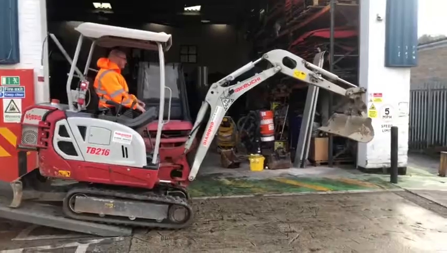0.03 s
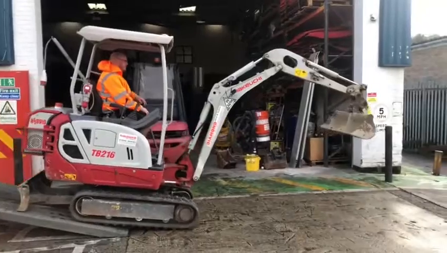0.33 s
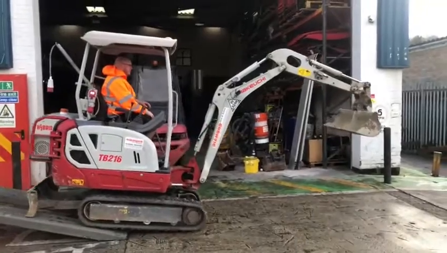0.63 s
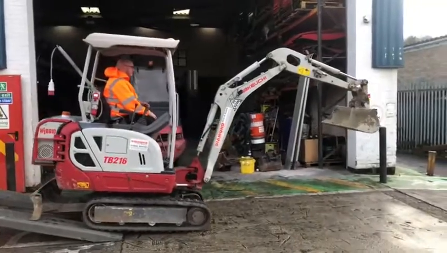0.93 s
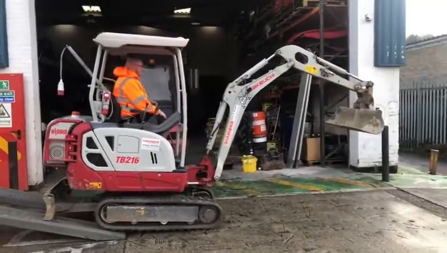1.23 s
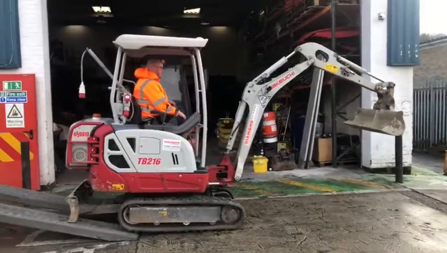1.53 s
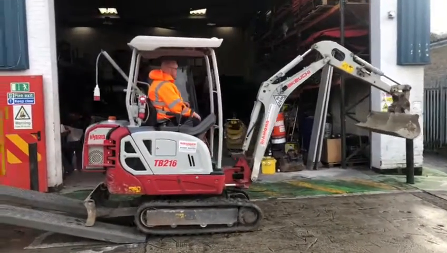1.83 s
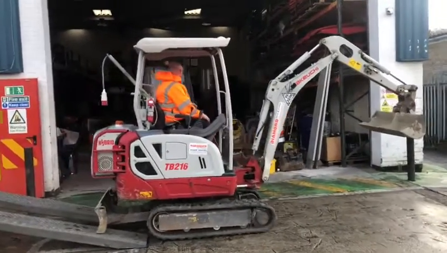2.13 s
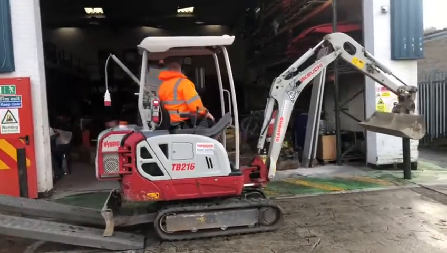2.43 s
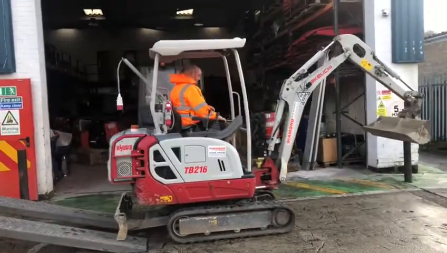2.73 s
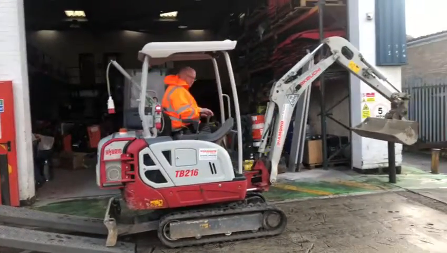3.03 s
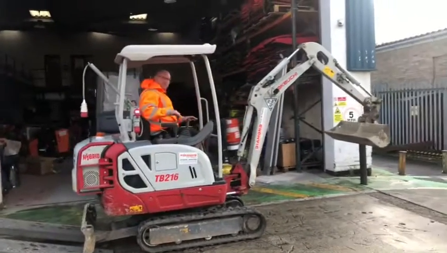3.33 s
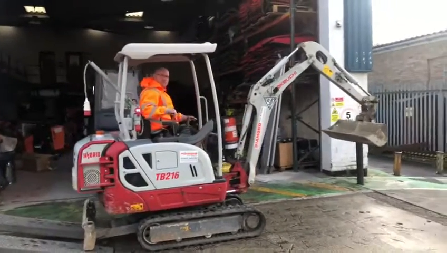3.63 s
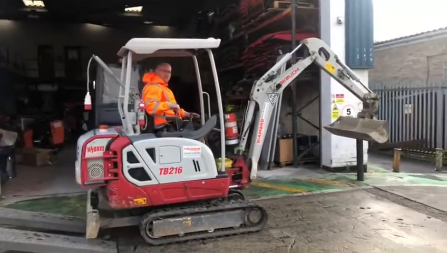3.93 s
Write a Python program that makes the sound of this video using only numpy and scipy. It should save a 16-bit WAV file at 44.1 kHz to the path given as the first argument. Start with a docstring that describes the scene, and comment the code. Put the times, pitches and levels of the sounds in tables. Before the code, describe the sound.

A small digger's tracks clank loudly off metal ramps, dropping to faint clatter and hum.

```python
"""In a yard, a small tracked digger crawls off steel ramps a few metres away. The periodic firing of its
diesel makes a drone that sags in pitch under load. Impacts of the tracks excite the modes of the steel,
which rattles, rumbles and clanks; grit and stones crack underneath, and the walls add a short echo.
At 1.5 s the sound drops abruptly: a faint, hollow track clatter goes on until the machine stops
at 3 s and leaves a quiet hum."""
import sys
import numpy as np
from scipy import signal
from scipy.fft import rfft, irfft, next_fast_len
from scipy.io import wavfile
from scipy.ndimage import uniform_filter1d

SR = 44100
rng = np.random.default_rng(int(sys.argv[2]) if len(sys.argv) > 2 else 0)


def wav_record(signal):
    """Record a signal, one row per channel, as 16-bit PCM in the file named by sys.argv[1]."""
    frames = np.transpose(np.atleast_2d(signal))
    bounded = np.clip(frames, -1, 1)
    # unit amplitude maps onto the largest positive 16-bit level
    quanta = np.round(bounded * 32767).astype(np.int16)
    wavfile.write(sys.argv[1], SR, quanta)


N = 176400
T = np.arange(N) / SR

# Spectrum of struck steel. Each row: frequency in Hz, relative spectral density in dB.
STEEL_SPECTRUM = [(100, -4), (300, 1), (480, -0.5), (580, 5.5), (780, 7.5), (1000, -0.5), (1400, -7),
                  (1700, -10.5), (1950, -9.5), (2250, -16), (2800, -17.5), (3250, -16), (3700, -20.5),
                  (5000, -27.5), (6300, -28), (7500, -35.5), (11500, -50)]
# Spectrum of a heavy thud. Each row: frequency in Hz, relative spectral density in dB.
THUD_SPECTRUM = [(30, -17.5), (55, -2.5), (75, 6), (105, 2), (135, 4.5), (190, 0.5), (255, 2.5),
                 (330, -7.5), (440, -3.5), (520, -11), (800, -44.5)]
THUD_T60_S = .24


def engine():
    """Combustion is periodic: each firing drives the exhaust tone and knocks on the block."""
    # Each row: time in seconds, firing rate in Hz, level of the tone in dB.
    running = [(0, 76.26, -30.5), (.15, 75.95, -29), (.55, 76.28, -28.5), (.76, 76.17, -30),
               (.92, 69.75, -28.5), (1.1, 70.63, -30.5), (1.22, 64.94, -29), (1.48, 66, -36.5)]
    knock_db, knock_decay_cycles = -37.5, .34
    tone, phase = exhaust(curve(running, 1))
    knock = colour(rng.standard_normal(N) * np.exp(-phase / knock_decay_cycles), STEEL_SPECTRUM)
    return tone * undb(curve(running, 2)) + undb(knock_db) * unit(knock)


def exhaust(firing_hz):
    """Uneven firings put half orders between the harmonics. Returns the tone and the firing phase."""
    # Each row: multiple of the firing rate, relative level in dB.
    orders = [(.5, -23), (1, -0.5), (1.5, -12), (2, -10), (2.5, -15.5), (3, -22), (3.5, -16.5), (4, -21),
              (5, -19.5), (6, -18)]
    cycles = np.cumsum(firing_hz * (1 + .005 * walk(25))) / SR
    tone = sum(undb(db + .9 * walk(30)) * np.sin(2 * np.pi * (order * cycles + rng.random()))
               for order, db in orders)
    return unit(tone), cycles % 1


def clanks():
    """Impact excitation: each hard blow of a track on a ramp gives a ring, a bright crash and a thud."""
    # Each row: start in seconds, then levels of body, treble and thud in dB.
    impacts = [(0.06, -28, -50, -31.5), (.115, -29, -42, -30.5), (.132, -25, -34.5, -33.5),
               (.184, -25.5, -42, -27.5), (.21, -28.5, -44, -46), (.318, -23, -38.5, -32),
               (.395, -27, -65, -29), (.49, -27.5, -35.5, -43), (.548, -27, -30, -37), (.62, -28, -31, -24),
               (.648, -33.5, -37.5, -27), (.685, -23.5, -33, -25), (0.755, -23, -29, -29),
               (.772, -23.5, -27, -33), (0.835, -19, -31, -22.5), (.901, -28, -34, -26.5),
               (.948, -20.5, -24, -24.5), (1.03, -19.5, -31, -29.5), (1.087, -16.5, -28.5, -24),
               (1.11, -18, -29.5, -24), (1.15, -23, -32.5, -33.5), (1.175, -20, -36, -22.5),
               (1.233, -18.5, -29.5, -25.5), (1.263, -22, -34, -24), (1.301, -26.5, -26.5, -22.5),
               (1.373, -22.5, -23, -19.5), (1.388, -19.5, -29.5, -19.5), (1.42, -27.5, -24, -27),
               (1.446, -20, -24, -28), (1.468, -36.5, -35.5, -27)]
    out = np.zeros(N)
    for start, body_db, treble_db, thud_db in impacts:
        body, _ = split(struck_steel(crash_t60=.13))
        _, treble = split(struck_steel(crash_t60=.14))
        thud = burst(THUD_SPECTRUM, THUD_T60_S)
        add(out, blow(body, body_db) + blow(treble, treble_db) + blow(thud, thud_db), start)
    return out


def struck_steel(crash_t60):
    """Modal vibration: dense modes merge into a crash while the main ones ring, the lowest longest."""
    # Modes of ramps and undercarriage. Each row: frequency in Hz, relative level in dB.
    modes = [(437, 3), (600, 1), (673, -1), (716, 14), (822, 12.5), (892, -17), (955, 0.5), (1211, 2.5),
             (1448, -1.5), (1523, -11), (1900, -10.5), (2487, -7), (3198, -14.5)]
    crash = burst(STEEL_SPECTRUM, crash_t60)
    t, ring = T[:len(crash)], 0
    for hz, db in modes:
        force, detune = rng.standard_normal(2)  # different at every spot struck
        t60 = .22 * (700 / hz) ** .62
        ring += undb(db) * force * np.sin(2 * np.pi * hz * (1 + .001 * detune) * t) * fade(t60)
    return unit(crash) + undb(-8.5) * unit(ring)


def track_rattle():
    """Random impacts of links and rollers overlap into a rattle; the machine's weight makes them rumble."""
    # Each row: time in seconds, then levels of body, treble and rumble in dB.
    levels = [(0, -50, -41, -32), (.14, -33, -49.5, -39.5), (.46, -40, -42, -41.5), (.6, -27, -37, -48),
              (.72, -25.5, -36.5, -28.5), (.91, -27.5, -37.5, -38.5), (1.0, -25, -30, -31),
              (1.2, -32.5, -36.5, -33), (1.35, -26, -30, -27), (1.46, -18.5, -32.5, -24)]
    body, treble = split(shake(lambda: struck_steel(crash_t60=.11), per_second=600))
    rumble = shake(lambda: burst(THUD_SPECTRUM, THUD_T60_S), per_second=200)
    return (unit(body) * undb(curve(levels, 1)) + unit(treble) * undb(curve(levels, 2))
            + rumble * undb(curve(levels, 3)))


def pin_clinks():
    """Damped resonance: track pins ring briefly as they strike the hardest edges."""
    # Each row: start in seconds, level in dB.
    clinks = [(0.132, -34), (0.771, -36), (.949, -38), (1.373, -29.5)]
    # Each row: frequency in Hz, relative spectral density in dB.
    pin_spectrum = [(1300, -23), (1650, -4), (1900, 9), (2080, -2), (2300, -12), (3300, -13), (4200, -32),
                    (9000, -38.5)]
    return strikes(clinks, pin_spectrum, t60=.061)


def stone_cracks():
    """Brittle fracture: stones break under the tracks, each with a short, bright crunch."""
    # Each row: start in seconds, level in dB.
    fractures = [(0.549, -38.5), (.62, -50), (0.949, -38), (1.303, -38.5), (1.371, -34)]
    # Each row: frequency in Hz, relative spectral density in dB.
    crack_spectrum = [(2000, -17), (3800, 3.5), (5600, 2.5), (6500, 0), (7500, -8), (11500, -12.5)]
    return strikes(fractures, crack_spectrum, t60=.16)


def grit():
    """Many tiny fractures add up to a crunch as the tracks crush grit on the concrete."""
    # Each row: time in seconds, level in dB.
    levels = [(0, -60.5), (.49, -59), (.56, -52), (.78, -45), (.9, -50.5), (1.05, -48), (1.16, -40),
              (1.21, -48.5), (1.33, -49), (1.47, -41)]
    # Each row: frequency in Hz, relative spectral density in dB.
    grit_spectrum = [(2000, -14.5), (4000, 6.5), (6300, -3), (8000, -1), (11000, -1.5), (12000, -9.5)]
    crunch = shake(lambda: burst(grit_spectrum, t60=.024), per_second=1500)
    return crunch * undb(curve(levels, 1) + walk(17))


def faint_clatter():
    """Light impacts of the links excite hollow resonances until the tracks come to rest."""
    # Continuous rattle. Each row: time in seconds, then levels of body and treble in dB.
    levels = [(1.48, -53.5, -65.5), (1.6, -62.5, -76), (1.71, -63, -79), (1.74, -72, -79.5),
              (1.78, -57, -67.5), (1.88, -53.5, -63.5), (2.0, -57.5, -70), (2.11, -57.5, -70),
              (2.17, -54, -63.5), (2.47, -55, -65.5), (2.68, -52.5, -59.5), (2.77, -57, -65.5),
              (2.87, -54.5, -61), (2.99, -56, -66), (3.07, -65, -74), (3.3, -78.5, -90.5), (4, -81, -89)]
    # Single knocks. Each row: start in seconds, then levels of body and treble in dB.
    knocks = [(1.762, -56, -65), (1.826, -50, -58.5), (1.88, -70, -67), (1.947, -53.5, -81),
              (2.016, -52.5, -69), (2.138, -51.5, -62), (2.197, -59, -64), (2.252, -50.5, -62),
              (2.275, -55, -66), (2.397, -56, -63), (2.524, -54, -60.5), (2.648, -52, -71),
              (2.814, -49.5, -59.5), (2.86, -61, -66), (3.725, -66.5, -81)]
    # Resonances of the tracks. Each row: frequency in Hz, relative spectral density in dB.
    hollow_spectrum = [(120, -32), (200, -21.5), (249, -10), (322, -37.5), (401, -11.5), (459, -11.5),
                       (517, -12.5), (553, -3), (592, -0.5), (738, 3), (817, -3), (968, -8.5), (1070, -17),
                       (1430, -11.5), (1780, -20), (2010, -18.5), (2150, -23), (2460, -15), (2820, -19),
                       (4020, -22), (4450, -27.5), (4840, -23), (7150, -35), (10600, -46.5), (11500, -37),
                       (15000, -79), (22000, -120)]
    # Treble of a knock. Each row: frequency in Hz, relative spectral density in dB.
    tick_spectrum = [(1300, -11), (1500, 15), (2100, -4), (2500, 7), (4000, 3), (5000, 0.5), (7000, -5.5),
                     (11500, -20)]
    body, treble = split(shake(lambda: burst(hollow_spectrum, t60=.058), per_second=900))
    out = unit(body) * undb(curve(levels, 1)) + unit(treble) * undb(curve(levels, 2))
    for start, body_db, treble_db in knocks:
        knock, _ = split(burst(hollow_spectrum, t60=.14))
        tick = burst(tick_spectrum, t60=.2)
        add(out, blow(knock, body_db) + blow(tick, treble_db), start)
    return out


def faint_hum():
    """Superposition: the engine's faint harmonics and a wavering tone lie over a low boom and a hush."""
    # Each row: time in seconds, firing rate in Hz, then levels of hum and boom in dB.
    running = [(1.48, 72, -70.5, -64), (1.75, 74.1, -74.5, -68), (1.95, 74.5, -69, -63.5),
               (2.35, 74.1, -78, -67.5), (2.55, 72.8, -75, -65.5), (2.95, 74.7, -77.5, -70.5),
               (3.2, 80.56, -71.5, -73.5), (3.52, 80.7, -75, -79), (3.7, 79.4, -83.5, -73.5),
               (4, 79, -84, -79)]
    # Hollow tone, strongest while the machine rolls. Each row: time in seconds, level in dB.
    tone_levels = [(1.5, -82), (1.78, -77), (1.9, -68), (2.33, -67), (2.45, -80), (2.9, -71.5),
                   (3.1, -81.5), (4, -94)]
    # Two noise spectra. Each row: frequency in Hz, relative spectral density in dB.
    boom_spectrum = [(35, -14), (55, -9), (90, -4.5), (130, -5), (170, -0.5), (260, -3), (400, -6.5),
                     (600, -37.5)]
    hush_spectrum = [(18, -58), (30, -31.5), (81, -7.5), (104, -7.5), (296, -13.5), (327, -10), (674, -16),
                     (782, -12), (1350, -19.5), (1530, -22), (11500, -31.5), (15000, -63), (22000, -120)]
    hum, _ = exhaust(curve(running, 1))
    boom = unit(colour(rng.standard_normal(N), boom_spectrum))
    hush = unit(colour(rng.standard_normal(N), hush_spectrum))
    tone = wavering_tone(hz=134, spread=.03, rate=9.4)
    return (hum * undb(curve(running, 2) + 1.574 * walk(30))
            + boom * undb(curve(running, 3))
            + tone * undb(curve(tone_levels, 1) + 2.5 * walk(18))
            + hush * undb(-72.5 + .7 * walk(14)))


def roller_squeak():
    """A track roller squeaks once: a frequency-modulated tone under a Gaussian envelope."""
    centre_s, width_s = 2.67, .03
    envelope = np.exp(-((T - centre_s) / width_s) ** 2)
    return undb(-69) * wavering_tone(hz=4720, spread=.008, rate=150) * envelope


def yard(x):
    """Reverberation: reflections from the walls and the open workshop add a short, decaying tail."""
    size, delay_s, echo_db = SR // 2, .014, -7
    tail = rng.standard_normal(size) * fade(t60=.4, size=size) * (T[:size] > delay_s)
    return x + undb(echo_db) * signal.fftconvolve(x, tail / np.linalg.norm(tail))[:N]


def shake(ring, per_second, spots=12):
    """Shot noise: random impacts of uneven force fall on several spots, each with its own response."""
    out, scatter_db = 0, 2
    for _ in range(spots):
        hits = rng.random(N) < per_second / spots / SR
        force = undb(scatter_db * np.clip(rng.standard_normal(N), -2, 2))
        out += signal.fftconvolve(hits * force, unit(ring()))[:N]
    return unit(out)


def burst(spectrum, t60, size=16384):
    """Modal overlap: a blow on countless close resonances sounds as decaying coloured noise."""
    attack_s = .0014  # a blow builds over several contacts
    rise = 1 - np.exp(-T[:size] / attack_s)
    return colour(rng.standard_normal(size) * fade(t60) * rise, spectrum)


def strikes(events, spectrum, t60):
    """Superposition of noise bursts, one for each start time and level."""
    out = np.zeros(N)
    for start, db in events:
        add(out, blow(burst(spectrum, t60), db), start)
    return out


def wavering_tone(hz, spread, rate):
    """Frequency modulation: a sine at rms 1 whose pitch wanders at random."""
    return unit(np.sin(2 * np.pi * np.cumsum(hz * (1 + spread * walk(rate))) / SR))


def colour(x, spectrum):
    """Minimum-phase filter that follows points of frequency in Hz and gain in dB."""
    size = 2 * next_fast_len(len(x))
    hz, db = np.array(spectrum).T
    bin_hz = np.arange(size // 2 + 1) * SR / size
    gain = undb(np.interp(np.log(bin_hz + 1), np.log(hz), db))
    cepstrum = irfft(np.log(gain))
    cepstrum[1:size // 2] *= 2  # folding onto positive time makes the filter causal
    cepstrum[size // 2 + 1:] = 0
    return irfft(rfft(x, size) * np.exp(rfft(cepstrum)))[:len(x)]


def split(x, crossover_hz=1390):
    """A crossover separates the body of a sound from its treble."""
    return [signal.sosfilt(signal.butter(4, crossover_hz, kind, fs=SR, output="sos"), x)
            for kind in ("low", "high")]


def walk(rate):
    """Smooth random fluctuation at rms 1, with `rate` new values a second."""
    hold = int(SR / rate)
    steps = np.repeat(rng.standard_normal(N // hold + 1), hold)
    return unit(uniform_filter1d(uniform_filter1d(steps, hold), hold)[:N])


def fade(t60, size=16384):
    """Exponential decay by 60 dB in t60 seconds."""
    return np.exp(-np.log(1000) * T[:size] / t60)


def blow(x, db):
    """Give a transient the energy of 20 ms of steady sound at this level."""
    return undb(db) * x / np.sqrt(np.sum(x ** 2) / (.02 * SR))


def add(out, x, start):
    """Mix a sound in at its start in seconds."""
    i = int(start * SR)
    out[i:i + len(x)] += x[:N - i]


def curve(table, column):
    """Linear interpolation of one column over time."""
    rows = np.array(table)
    return np.interp(T, rows[:, 0], rows[:, column])


def undb(db):
    """Decibels to amplitude gain."""
    return 10 ** (np.asarray(db) / 20)


def unit(x):
    """Scale to rms 1."""
    return x / np.sqrt(np.mean(x ** 2))


def drop(linger_s=0):
    """Gain that falls linearly from one to zero where the loud part ends."""
    start_s, length_s = 1.474, .018
    return np.clip(1 - (T - start_s - linger_s) / length_s, 0, 1)


def scene():
    """A rapid crossfade leads from the loud descent to the faint roll-out; the bass goes last."""
    loud = engine() + yard(track_rattle() + clanks() + pin_clinks() + grit() + stone_cracks())
    bass = signal.sosfiltfilt(signal.butter(2, 150, fs=SR, output="sos"), loud)
    faint = faint_clatter() + faint_hum() + roller_squeak()
    return (drop() * (loud - bass) + drop(linger_s=.018) * bass + (1 - drop()) * faint)[None]


def record(dry):
    """A soft limiter rounds the loudest peaks; filters trim the deepest bass and the top."""
    peak_limit, bottom_hz, top_hz = .7, 36, 11600
    rounded = peak_limit * np.tanh(dry / peak_limit)
    thinned = signal.sosfilt(signal.butter(3, bottom_hz, "high", fs=SR, output="sos"), rounded)
    return signal.sosfilt(signal.ellip(10, .2, 80, top_hz, fs=SR, output="sos"), thinned)


dry = scene()
out = record(dry)
wav_record(out)
```